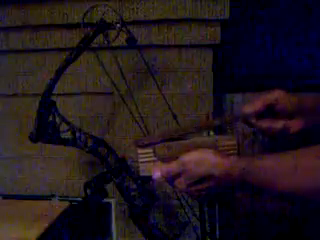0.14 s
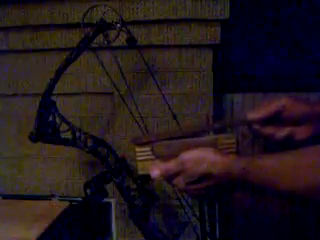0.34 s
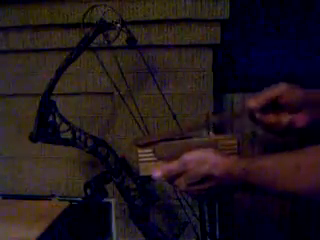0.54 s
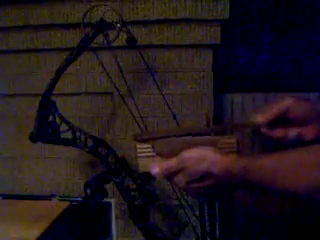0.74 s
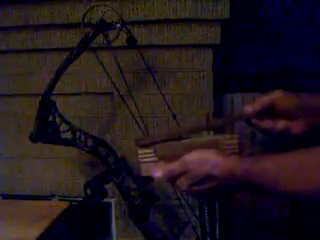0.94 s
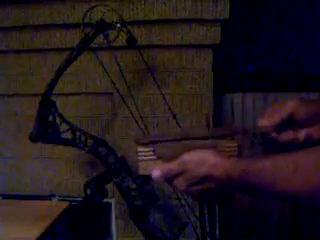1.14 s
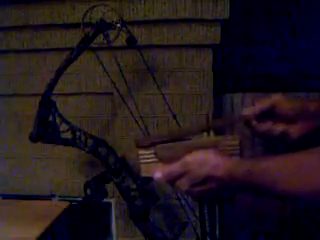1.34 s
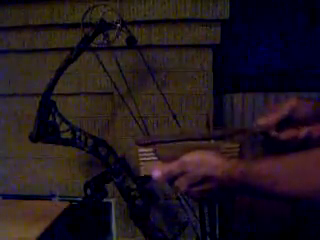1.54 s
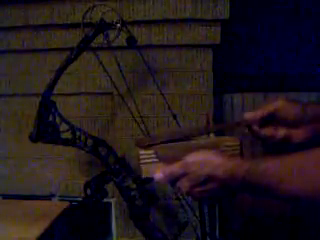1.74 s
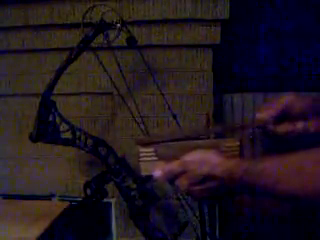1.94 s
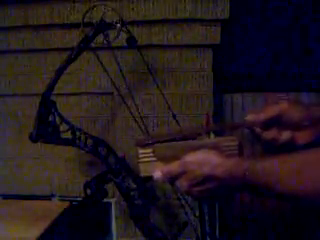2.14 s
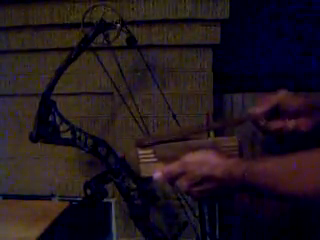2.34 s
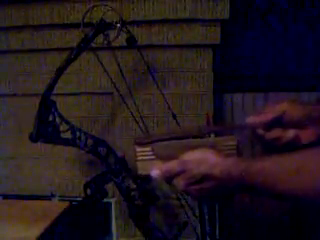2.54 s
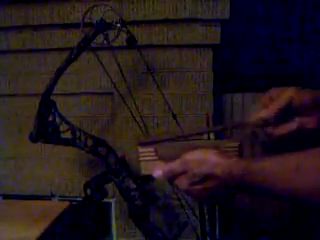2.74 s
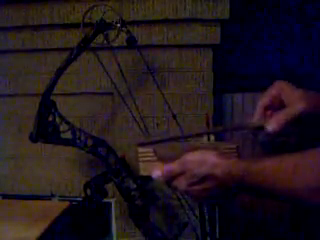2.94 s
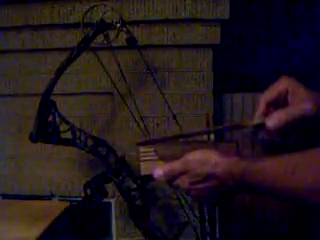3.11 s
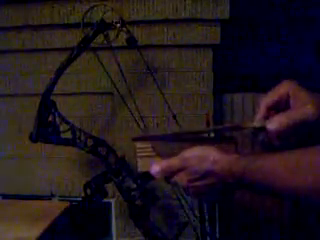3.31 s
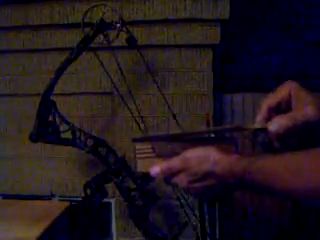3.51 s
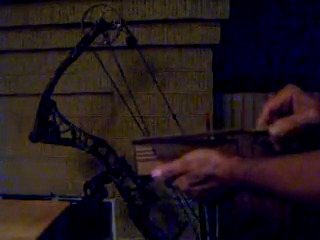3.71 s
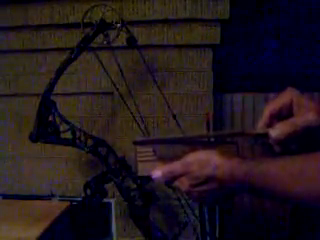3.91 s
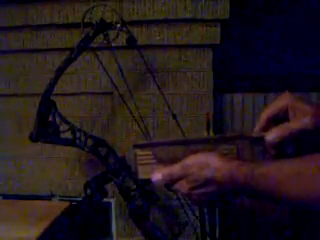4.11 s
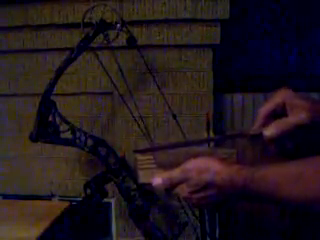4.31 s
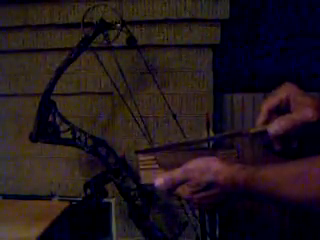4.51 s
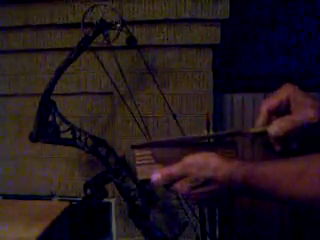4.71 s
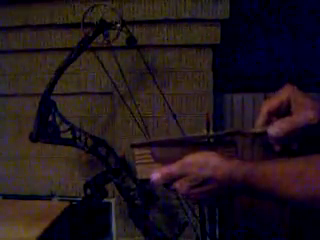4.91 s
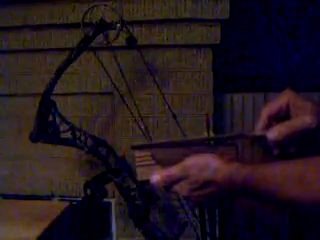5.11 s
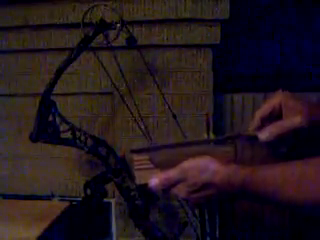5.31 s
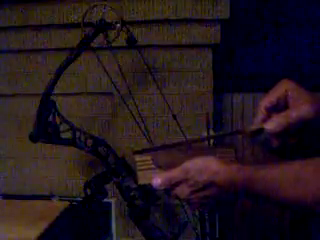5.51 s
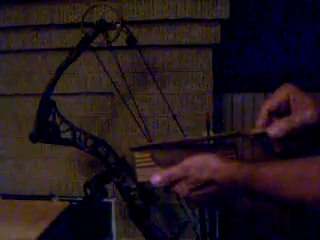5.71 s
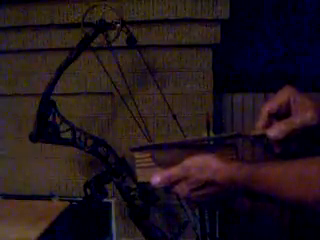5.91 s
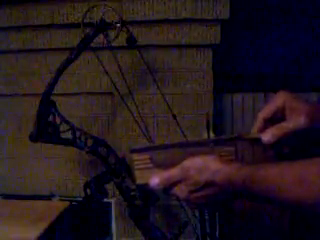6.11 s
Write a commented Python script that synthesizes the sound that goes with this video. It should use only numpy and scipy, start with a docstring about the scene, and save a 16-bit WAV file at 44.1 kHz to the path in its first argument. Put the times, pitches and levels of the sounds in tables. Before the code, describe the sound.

Close, slightly distorted turkey-like yelps scraped from a wooden box call, first slow and raspy, then in fast chattering bursts.

```python
"""Eight slow, squealing yelps from a wooden box turkey call, then three quick choppy runs.
The lid taps the rim, sticks and slips on it about 800 times a second, and skids off in a rasp.
The box favours the octave, the note at twice that rate. The call is played close to a small
microphone that overloads. Behind it are a small room, a low hum and some soft shuffling."""
import sys
import numpy as np
from scipy import signal
from scipy.fft import rfft, irfft, next_fast_len
from scipy.io import wavfile

SR = 44100
rng = np.random.default_rng(int(sys.argv[2]) if len(sys.argv) > 2 else 0)


def generate_wav(signal):
    """Clip the signal to [-1, 1] and save it as 16-bit WAV at the path in sys.argv[1]."""
    frames = np.transpose(np.atleast_2d(signal))
    scaled = np.clip(frames, -1, 1) * 32767
    pcm = np.round(scaled).astype(np.int16)
    wavfile.write(sys.argv[1], SR, pcm)


N = 271215
TIME = np.arange(N) / SR

# Slow strokes of the lid. Press time and length count from the start; bite is how hard the lid grips.
# (start [s], attack [s], press time [s], press width [s], length [s], slip rate [Hz],
#  pitch lift at the edge [Hz], level [dB], press boost [dB], bite [0-1], rasp level [dB])
YELP_STROKES = [(-.09, .015, 0.0783, 0.0305, .174, 839.8, 21.55, -11.5, 17, 0.6, -13.5),
                (0.399, .022, .054, 0.0528, 0.1324, 793.8, 64.16, -10, 10.5, .33, -15),
                (0.789, 0.0088, 0.0411, 0.0315, 0.08136, 790.6, 44, -5.5, 6.5, 0.5, -9.5),
                (1.153, 0.01138, 0.0447, 0.0214, 0.0602, 783.2, 32.28, -4.5, 4.5, .6, -6),
                (1.5, .012, .055, 0.0353, .09, 794.2, 42, -6, 8.5, .36, -11),
                (1.873, .017, .055, .013, .069, 782.2, 27.82, -4.5, 4, .62, -3.5),
                (2.234, .009, 0.05324, 0.0182, 0.08245, 777.3, 54.16, -4.5, 4.5, .76, -9),
                (2.609, .012, 0.0548, 0.01, 0.073, 768.8, 41.7, -6, 8.5, 0.8, -6)]
# Light, brief catches of the lid: (time [s], level [dB], half length [s])
CHIRP_CATCHES = [(3.662, -34.5, .01), (3.731, -35, 0.0088), (3.781, -26.5, 0.012), (3.807, -20, .02),
                 (3.855, -15, .014), (3.923, -14.5, 0.014), (3.969, -12, .015), (4.017, -10, 0.014),
                 (4.061, -8, 0.011), (4.107, -9.5, .015), (4.968, -24, 0.019), (5.002, -27.5, 0.018),
                 (5.026, -15.5, .013), (5.092, -14.5, .0085), (5.128, -11.5, 0.014), (5.156, -10, .015),
                 (5.181, -10.5, .009), (5.229, -5.5, 0.01328), (5.877, -29.5, .011), (5.952, -22.5, .007),
                 (5.973, -16.5, 0.014), (6.013, -13.5, 0.018), (6.049, -13.5, 0.018), (6.08, -10.5, .006),
                 (6.116, -6, .0063), (6.128, -9, .01), (6.15, -7, .005)]
# The slip rate climbs through each run of chirps: (start [s], end [s], first rate [Hz], last rate [Hz])
CHIRP_RUNS = [(3.8, 4.147, 832.5, 884.6), (4.93, 5.237, 820.5, 876), (5.86, 6.029, 830.6, 867)]
# Short hard strokes, called cutts, that end the first two runs:
# (start [s], length [s], slip rate [Hz], level [dB], rasp level [dB])
CUTT_STROKES = [(4.152, .055, 873.9, -12, -26), (5.264, .063, 866.9, -11, -30)]
# The pure tones in the squeal: (multiple of the slip rate, level at no bite [dB], at full bite [dB])
SQUEAL_PARTIALS = [(1, -21.5, -8.5), (2, 5, 4.5), (3, -21.5, -1), (4, -33.5, -7.5), (5, -44.5, -10.5),
                   (6, -38.5, -17), (7, -59, -15.5), (8, -58, -37), (9, -62, -51)]
# Friction hiss under the squeal: (frequency [Hz], relative level [dB])
GRIT_SPECTRUM = [(1450, -32), (1900, -0.5), (3000, -8), (7000, -11)]
# How strongly the box sends out each part of the squeal: (frequency [Hz], gain [dB])
BOX_RESPONSE = [(770, 0.5), (860, 3), (1650, -1), (2330, 1.5), (2600, 3.5), (3100, 5), (3400, 7),
                (3900, 4.5), (7000, 6)]
# The lid is set down on the box: (time [s], peak level [dB])
LID_TAPS = [(0.315, -30), (.772, -10.5), (1.111, -20.5), (1.475, -18), (1.837, -23.5), (2.208, -20.5),
            (2.563, -17), (4.792, -43), (5.746, -36), (5.768, -45)]
# The notes at which box and lid ring: (frequency [Hz], relative level [dB], time to fade 60 dB [s])
WOOD_MODES = [(788.5, -9, 0.056), (1087, -2.5, 0.015), (1317, -8, .06), (1304, -0.5, 0.023),
              (1570.4, 1.5, 0.08), (1893, -8.5, .015), (2644, -6, .025), (3107, -2.5, 0.047),
              (3382, -13.5, 0.083), (3802, -10, 0.023), (4930, -24.5, 0.0079), (5634, -9.5, 0.014),
              (6600, -13, 0.0088)]
# How long the room rings: (frequency [Hz], time to fade 60 dB [s])
ROOM_DECAY = [(1000, 0.2423), (2500, 0.2208), (3400, 0.2495), (7000, 0.1259)]
# Steady rumble and hiss: (frequency [Hz], relative level [dB])
HISS_SPECTRUM = [(5, -19.5), (18, 12.5), (27, -13.5), (90, -14.5), (170, -11), (350, -17), (1500, -27),
                 (4000, -33), (7500, -35.5), (9000, -36.5)]
# The dull tone of the shuffling: (frequency [Hz], relative level [dB])
SHUFFLE_SPECTRUM = [(25, 2), (90, -2.5), (250, -8.5), (450, -19.5), (2000, -57.5)]
# The shuffling grows near the end: (time [s], level [dB])
SHUFFLE_SWELL = [(4.8, -59), (5.1, -42), (5.4, -36), (5.68, -42), (5.75, -30.5), (5.82, -37), (6.15, -38)]

ONSET_DB = -14  # how much quieter a stroke is one attack time before its start
RELEASE_S, RELEASE_DB_PER_S = .045, 449.5  # the fade once the lid is past the edge
SKID_LEAD_S = .006  # a yelp starts to skid this long before the edge


def squeal(hz, bite, tear, grit_db=-38, bite_grit_db=12, jitter=.0045, wander=.003):
    """The lid sticks and slips. Bite makes the tone brighter and grittier; tear makes it uneven."""
    n = len(hz)
    unsteady = 1 + (jitter + tear) * wobble(n, 500) + wander * wobble(n, 45)
    cycles = np.cumsum(hz * unsteady) / SR
    grain_db = 1.2 * wobble(n, 300)  # some slips are sharper than others
    tone, power = np.zeros(n), np.zeros(n)
    for multiple, light_db, hard_db in SQUEAL_PARTIALS:
        # the box holds the two lowest tones steady; higher ones flutter with the grain of the wood
        flutter_db = (multiple > 2) * (grain_db + 1.4 * wobble(n, 45))
        size = gain_of(light_db + (hard_db - light_db) * bite)
        tone += size * gain_of(flutter_db) * np.sin(2 * np.pi * multiple * cycles)
        power += size ** 2 / 2
    grit = gain_of(grit_db + bite_grit_db * bite) * noise(n, GRIT_SPECTRUM)
    return tone / np.sqrt(power) + grit


def yelp(start, attack, press_at, press_width, length, hz, lift_hz, db, press_db, bite, rasp_db,
         entry_hz=12, settle_s=.011, drop_hz_per_s=1100, entry_bite=.024, edge_bite=.8172):
    """A slow stroke: the lid grips, the hand presses, then the pitch lifts and the tone tears."""
    t = np.arange(max(-2 * attack, -start), length + RELEASE_S, 1 / SR)
    entering = np.maximum(-t / attack, 0)
    press = np.exp(-((t - press_at) / press_width) ** 2)
    to_edge = np.clip((t - press_at) / (length - press_at), 0, 1)
    past_edge_s = np.maximum(t - length, 0)
    settling = entry_hz * np.exp(-np.maximum(t / settle_s, -1.6))  # the note starts a little high
    sag = .17 * press / press_width  # a sudden press pulls the pitch down furthest
    pitch = hz + settling - sag + lift_hz * to_edge ** 1.3 - drop_hz_per_s * past_edge_s
    level = db + ONSET_DB * entering ** 1.7 + press_db * press - RELEASE_DB_PER_S * past_edge_s
    grip = np.interp(t, [-attack / 2, .026], [entry_bite, bite])
    grip += (edge_bite - bite) * to_edge ** .72  # hardest at the edge
    near_skid = np.clip(1 + (t - length + SKID_LEAD_S) / .012, 0, 1)
    tone = squeal(pitch, np.clip(grip, 0, 1), tear=.055 * gain_of(rasp_db) * near_skid)
    return start + t[0], gain_of(level) * tone * signal.windows.tukey(len(t), .02)


def cutt(start, length, hz, db, rasp_db, attack_s=.005, surge_db=7, surge_s=.008, lowest_hz=812,
         fade_db_per_s=420):
    """A short hard stroke: one arch of pitch, surging as the lid catches and before it lets go."""
    t = np.arange(-2 * attack_s, length + RELEASE_S, 1 / SR)
    progress = t / length
    surges = sum(np.exp(-((t - share * length) / surge_s) ** 2) for share in (.12, .88))
    onset_db = ONSET_DB * np.minimum(t / attack_s, 0) ** 2
    level = db + surge_db * surges + onset_db - fade_db_per_s * np.maximum(t - length, 0)
    pitch = np.maximum(hz - 120 * (progress - .33) ** 2, lowest_hz)
    bite = np.interp(progress, [0, 1], [.63, .934])
    tone = squeal(pitch, bite, tear=.00672, grit_db=-42)
    return start + t[0], gain_of(level) * tone * signal.windows.tukey(len(t), .02)


def full_strokes():
    """The lid is drawn across the rim for each yelp and cutt."""
    out = np.zeros(N)
    for row in YELP_STROKES:
        add(out, *yelp(*row))
    for row in CUTT_STROKES:
        add(out, *cutt(*row))
    return out


def chirps(rub_db=-19, rub_spread=1.9, shake_db=.3):
    """Quick runs: each catch of the lid swells out of a faint rub, bends upward and lets go."""
    power, bend_hz = np.zeros(N), np.zeros(N)
    for time, db, half_length in CHIRP_CATCHES:
        offset = np.clip((TIME - time) / half_length, -20, 20)
        swell = np.exp(-2 * abs(offset) ** 2.1)
        rub = gain_of(rub_db) ** 2 * np.exp(-2 * (offset / rub_spread) ** 2)
        power += gain_of(db) ** 2 * (swell + rub)
        bend_hz += 6 * offset * np.exp(-offset ** 2 / 2)
    size = np.sqrt(power) * gain_of(shake_db * wobble(N, 90))
    times, rates = np.hsplit(np.array(CHIRP_RUNS), 2)
    climb = np.interp(TIME, times.ravel(), rates.ravel())
    # louder catches sit higher and bite harder
    pitch = climb * (1 + .018 * size) + bend_hz
    bite = np.clip(.034 + .943 * size, 0, 1)
    return size * squeal(pitch, bite, tear=.002, grit_db=-43)


def skids(yelp_skid_s=.04, cutt_skid_s=.01948):
    """Every full stroke ends in a skid: (start [s], length [s], level [dB])."""
    slow = [(start + length - SKID_LEAD_S, yelp_skid_s, db)
            for start, _, _, _, length, *_, db in YELP_STROKES]
    quick = [(start + length, cutt_skid_s, db) for start, length, *_, db in CUTT_STROKES]
    return slow + quick


def rasps(slips_per_s=300, scrape=.039, start_db=-6, release_s=.0021, from_hz=1630, to_hz=1250):
    """The lid chatters off the rim: uneven slips strike the wood while a broken croak falls in pitch."""
    out, t = np.zeros(N), TIME[:SR // 8]
    n = len(t)
    for start, length, db in skids():
        progress = np.minimum(t / length, 1)
        slip_rate = slips_per_s * np.exp(.5 * wobble(n, 200))
        slip_count = np.floor(np.cumsum(slip_rate) / SR)
        blows = np.diff(slip_count, prepend=0) * rng.random(n) + scrape * rng.standard_normal(n)
        ring = unit_rms(signal.oaconvolve(blows, wood_ring())[:n])
        pitch = (from_hz + (to_hz - from_hz) * progress) * (1 + .035 * wobble(n, 400))
        tone = np.sin(2 * np.pi * np.cumsum(pitch) / SR)
        croak = unit_rms(tone * np.exp(.5 * wobble(n, 160)))
        swell = gain_of(start_db * (1 - progress))
        release = np.exp(-np.maximum(t - length, 0) / release_s)
        add(out, start, gain_of(db) * swell * release * unit_rms(ring + 1.16 * croak))
    return out


def taps(scuff=.24, scuff_s=.004, lid_hz=1900, lid_fade_s=.028):
    """The lid lands on the rim: a brief scuff, the knock of the box and the lid's own short note."""
    out, t = np.zeros(N), TIME[:SR // 12]
    box = wood_ring()
    lid = gain_of(-60 * t / lid_fade_s) * np.sin(2 * np.pi * lid_hz * t)
    ring = box / abs(box).max() + 1.6 * lid
    for time, db in LID_TAPS:
        blow = (t == 0) + scuff * rng.standard_normal(len(t)) * np.exp(-t / scuff_s)
        tap = signal.oaconvolve(blow, ring)
        add(out, time, gain_of(db) * tap / abs(tap).max())
    return out


def wood_ring():
    """After one blow the wood rings at several notes, each fading at its own speed."""
    t = TIME[:SR // 12]
    ring = sum((-1) ** k * gain_of(db - 60 * t / fade_s) * np.sin(2 * np.pi * hz * t)
               for k, (hz, db, fade_s) in enumerate(WOOD_MODES))
    return ring / np.linalg.norm(ring)


def room(sound, build_s=.016):
    """A small room sends back scattered echoes; the highest pitches die first."""
    echoes = rng.choice([-1., 1.], SR // 2) * (rng.random(SR // 2) < 1 / 16)
    hz, t, bands = signal.stft(echoes, SR, nperseg=256)
    fade = gain_of(-60 * t / look_up(ROOM_DECAY, hz)[:, None])
    build = np.minimum(t / build_s, 1)
    _, tail = signal.istft(bands * fade * build, SR, nperseg=256)
    return signal.oaconvolve(sound, tail / np.linalg.norm(tail))[:N]


def background(hum_hz=58.17, hum_db=-38, hiss_db=-45.5):
    """A low hum, rumble and hiss, with soft shuffling near the end."""
    hum = gain_of(hum_db) * np.sqrt(2) * np.sin(2 * np.pi * (hum_hz * TIME + rng.random()))
    hiss = gain_of(hiss_db) * noise(N, HISS_SPECTRUM)
    shuffle_db = np.interp(TIME, *np.transpose(SHUFFLE_SWELL)) + 1.4 * wobble(N, 45)
    return hum + hiss + gain_of(shuffle_db) * noise(N, SHUFFLE_SPECTRUM)


def gain_of(db):
    """Turns decibels into a factor to multiply by."""
    return 10 ** (np.asarray(db) / 20)


def unit_rms(x):
    """Scales a signal so its typical size (rms) is 1."""
    return x / np.sqrt(np.mean(x ** 2) + 1e-20)


def look_up(table, hz):
    """Reads between a table's rows on a log-frequency scale."""
    row_hz, values = np.transpose(table)
    return np.interp(np.log(hz + 1), np.log(row_hz + 1), values)


def add(mix, start_s, sound):
    """Mixes a sound in at its start time."""
    part = mix[max(0, round(start_s * SR)):][:len(sound)]
    part += sound[:len(part)]


def coloured(x, spectrum):
    """Turns each frequency up or down as a table says."""
    n = next_fast_len(len(x) + SR // 20)
    gains = gain_of(look_up(spectrum, np.fft.rfftfreq(n, 1 / SR)))
    return irfft(rfft(x, n) * gains, n)[:len(x)]


def noise(n, spectrum):
    """Noise of typical size 1, shaped by a table."""
    return unit_rms(coloured(rng.standard_normal(n), spectrum))


def wobble(n, hz):
    """A random drift of typical size 1, swinging up to about hz times a second."""
    position = np.arange(n) * 2 * hz / SR
    return unit_rms(np.interp(position, np.arange(n), rng.standard_normal(n)))


def low_pass(x, hz, size):
    """Removes treble above hz; a larger size cuts more sharply."""
    return signal.oaconvolve(x, signal.firwin(size, hz, window="blackman", fs=SR), "same")


def scene(stroke_room_db=-15, chirp_room_db=-19, wood_room_db=-11):
    """The call close by, its echoes, and the background."""
    strokes = coloured(full_strokes(), BOX_RESPONSE)
    runs = coloured(chirps(), BOX_RESPONSE)
    wood = rasps() + taps()
    echoes = room(gain_of(stroke_room_db) * strokes + gain_of(chirp_room_db) * runs
                  + gain_of(wood_room_db) * wood)
    return (strokes + runs + wood + echoes + background())[None]


def record(dry, input_limit=.7354, output_limit=.7563, voice_band_hz=7932, top_hz=15900):
    """The microphone overloads: loud peaks are flattened and the high treble is cut."""
    fine = signal.resample_poly(dry[0], up=3, down=1)  # finer time steps keep false tones down
    clipped = signal.resample_poly(np.clip(fine, -input_limit, input_limit), up=1, down=3)
    narrow = low_pass(clipped, voice_band_hz, size=81)
    # the filtered peaks overshoot, clip again and spit a little treble
    clipped_again = np.clip(narrow, -output_limit, output_limit)
    return low_pass(clipped_again, top_hz, size=511)[None]


dry = scene()
out = record(dry)
generate_wav(out)
```